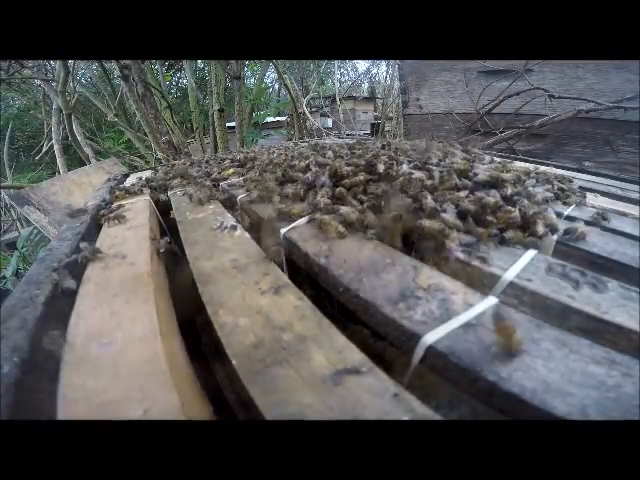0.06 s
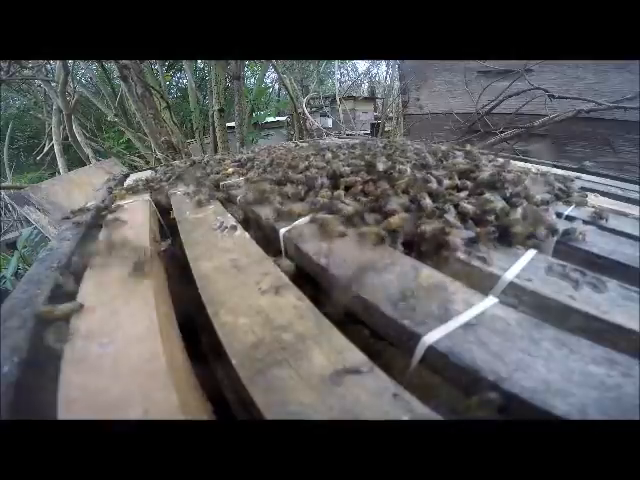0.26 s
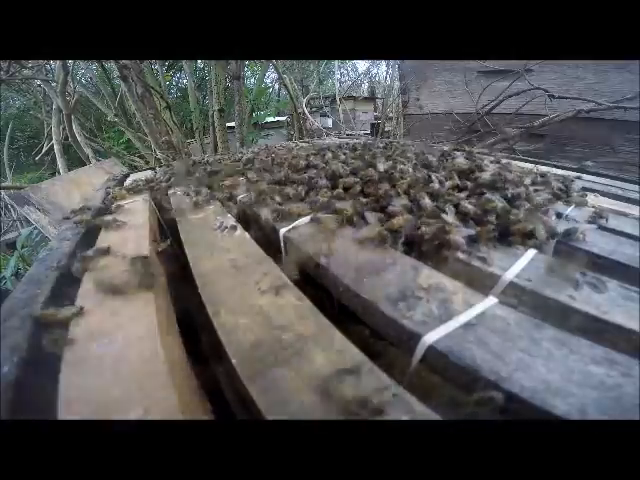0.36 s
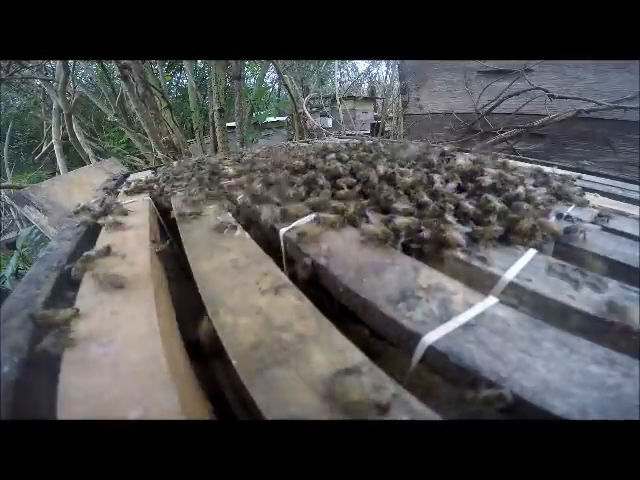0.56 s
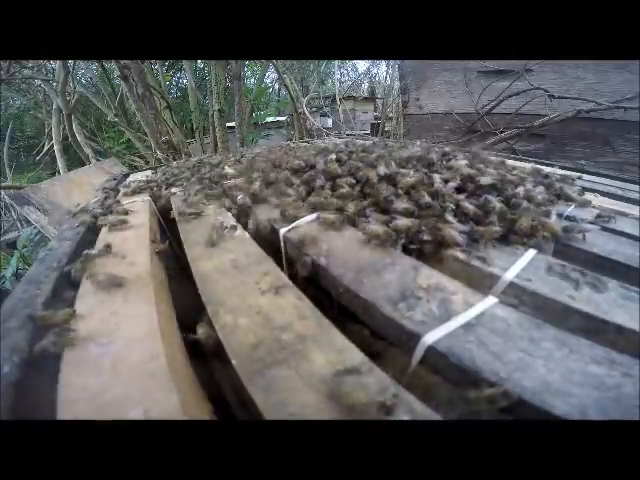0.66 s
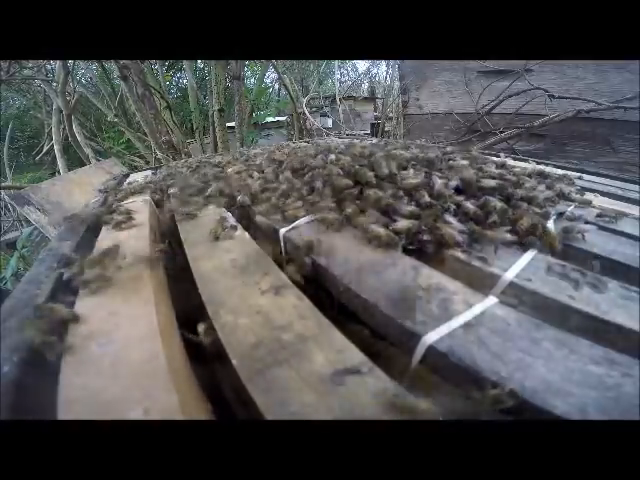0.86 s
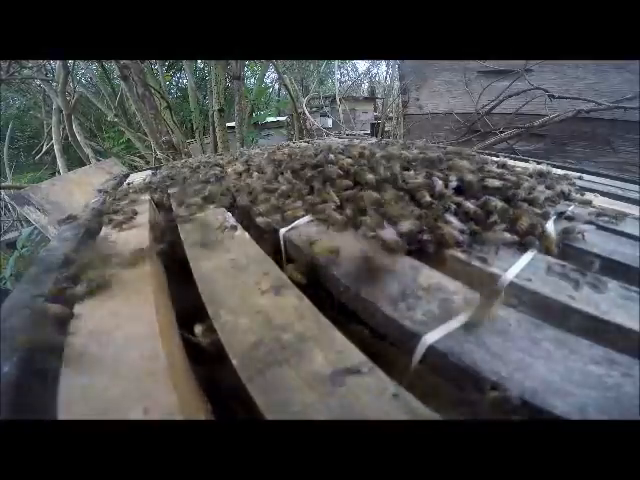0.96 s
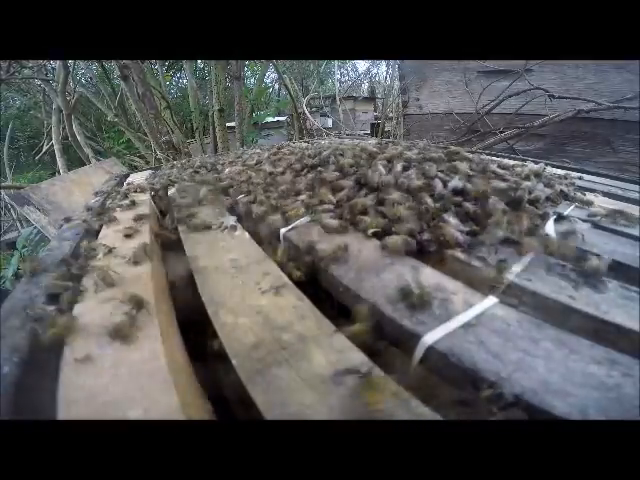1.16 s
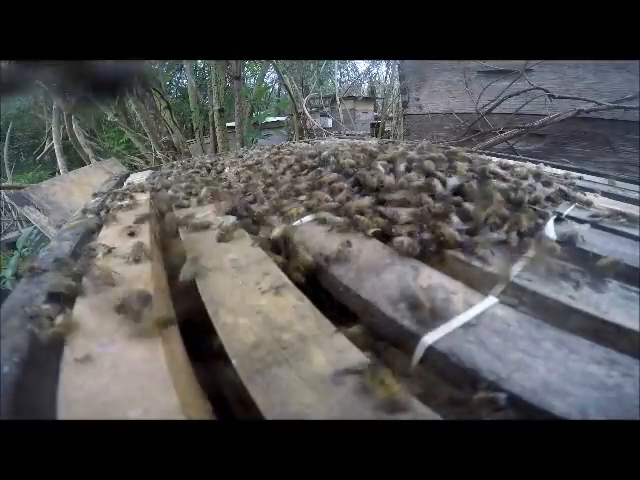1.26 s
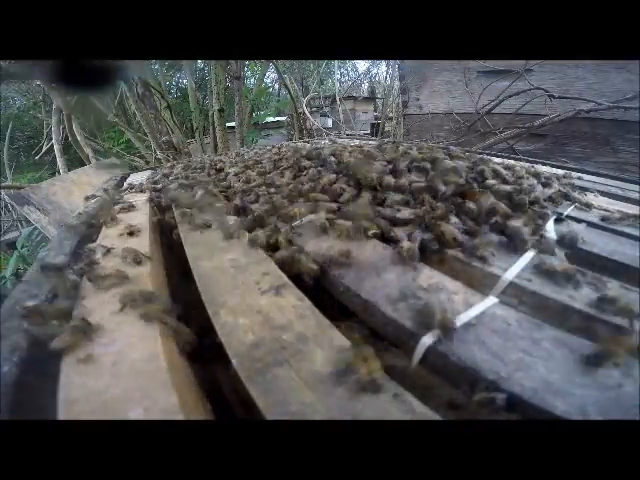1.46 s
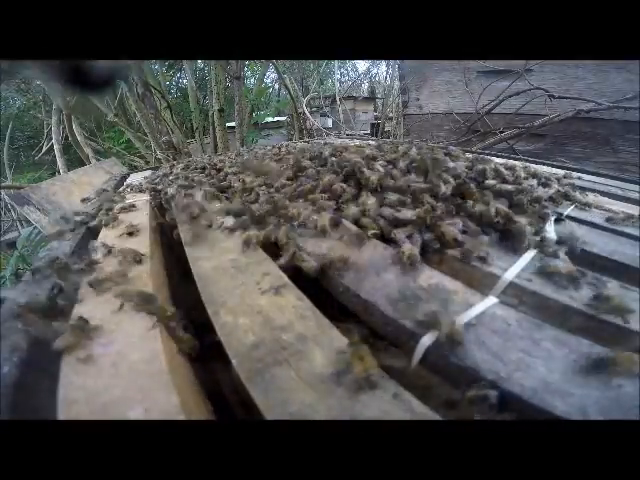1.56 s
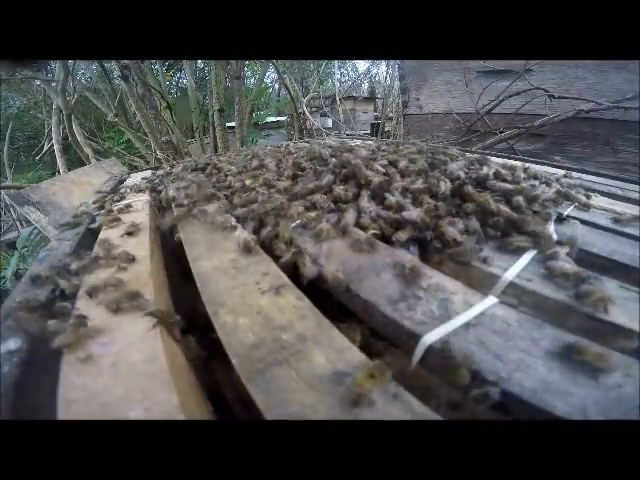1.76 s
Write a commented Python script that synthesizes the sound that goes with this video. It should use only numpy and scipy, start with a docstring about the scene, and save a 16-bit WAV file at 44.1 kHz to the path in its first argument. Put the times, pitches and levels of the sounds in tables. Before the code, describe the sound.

Clumps of bees knock and patter on hollow wood, first in a short burst, then after a brief lull in a longer, louder clatter with sharp clicks and dull box thumps, heard by a microphone resting on the bars outdoors.

```python
"""Outdoors at a hive, a mass of bees is shaken onto the wooden bars, on which the camera rests.
Clumps knock the bars, single bees patter on them and some strike the camera shell with a sharp tick:
each blow is a sum of decaying modes. The hive box booms under soft loads and shakes as noise-driven
resonances. Scraping legs and wings rustle as grainy noise; air rumble and hiss lie beneath."""
import sys
import numpy as np
from scipy import signal
from scipy.fft import rfft, irfft
from scipy.io import wavfile
from scipy.ndimage import uniform_filter1d

SR = 44100
rng = np.random.default_rng(int(sys.argv[2]) if len(sys.argv) > 2 else 0)


def invert_db(level):
    """Linear amplitude ratio for a level in decibels (20 dB per decade), elementwise."""
    return 10 ** (np.asarray(level, dtype=float) / 20)


def to_wav(s):
    """Save 16-bit WAV."""
    ch = np.atleast_2d(s).T  # columns
    pcm = np.round(np.clip(ch, -1, 1) * 32767)  # PCM
    wavfile.write(sys.argv[1], SR, pcm.astype(np.int16))


N = 81585  # length in samples

WOOD_SMEAR, SHELL_SMEAR = 0.007, 0.025  # blur of a ring as a share of its pitch, per kHz
SCATTER_DB, DETUNE = 4, 0.02  # chance spread of a mode's level [dB] and pitch [share]
SPOT_DB = 14  # level of the mode favoured by the struck spot, before hardness [dB]
STAGGER = 1.2  # spread of the modes' starts, in rise times
ROUGH, ROUGH_RISES = 0.2, 0.0015 / 0.0011  # raggedness [nepers]; wobble spacing, in rise times
HARD_TOP_HZ = 2220  # hardness stops lifting the bar modes further above here


def add(out, t, x):
    """Superposition: mix x into out from t seconds."""
    i = max(int(t * SR), 0)
    out[i:i + len(x)] += x[:N - i]


def coloured(points):
    """Spectral shaping: noise of rms 1 that follows (frequency [Hz], level [dB]) points."""
    hz, db = np.array(points).T
    bin_hz = np.fft.rfftfreq(N, 1 / SR)
    gain = invert_db(np.interp(np.log(bin_hz + 1), np.log(hz), db))
    x = irfft(rfft(rng.standard_normal(N)) * gain, N)
    return x / x.std()


def blow(modes, db, contact_s, chance, ring_s, tilt=0., spot_hz=0., scatter_db=SCATTER_DB,
         top_hz=SR / 2, smear=WOOD_SMEAR):
    """Modal superposition: staggered modes swell over contact_s and ring out raggedly; peak at db."""
    hz, gain_db, t60 = np.array(modes).T
    first_hz, k = hz[0], len(hz)
    level_luck, pitch_luck, phase_luck, start_luck = chance[:4 * k].reshape(4, k)
    rough_luck = chance[4 * k:]

    # Hardness tilts the levels per octave above the first mode
    gain_db = gain_db + tilt * np.log2(np.minimum(hz, top_hz) / first_hz) + scatter_db * level_luck
    nominal_hz = hz
    hz = hz * (1 + DETUNE * pitch_luck)
    width_hz = smear * hz ** 2 / 1000
    if spot_hz:
        # The mode nearest the favoured pitch takes that pitch and rings without blur
        near = np.argmin(np.abs(np.log(nominal_hz / spot_hz)))
        hz[near] = spot_hz
        gain_db[near] = SPOT_DB + tilt * np.log2(spot_hz / first_hz)
        width_hz[near] = 0

    t = np.arange(int(ring_s * SR)) / SR
    late = STAGGER * contact_s * np.abs(start_luck)
    late[np.argmax(gain_db)] = 0  # the strongest mode starts at once
    since = np.maximum(t - late[:, None], 0)

    # A random walk of the phase blurs each pitch
    phase = 2 * np.pi * (np.outer(hz, t) + phase_luck[:, None])
    drift = uniform_filter1d(rng.standard_normal(phase.shape), size=8).cumsum(axis=1)
    phase = phase + np.sqrt(2 * np.pi * width_hz / SR)[:, None] * drift

    rise = np.sin(np.pi / 2 * np.minimum(since / contact_s, 1)) ** 2
    decay = np.exp(-np.log(1000) * since / t60[:, None])
    wobble = np.interp(t / (ROUGH_RISES * contact_s), np.arange(len(rough_luck)), rough_luck)
    x = invert_db(gain_db) @ (np.sin(phase) * rise * decay) * np.exp(ROUGH * wobble)
    return x * invert_db(db) / np.abs(x).max()


# Band that travels along the bars: (lower edge [Hz], upper edge [Hz])
WOOD_BAND = [480, 5400]


def along_bars(x):
    """Band-limited transmission: the wood carries only the middle band."""
    return signal.sosfilt(signal.butter(5, WOOD_BAND, "band", fs=SR, output="sos"), x)


# Modes of the wooden bars: (frequency [Hz], relative level [dB], 60 dB decay time [s])
BAR_MODES = [(535, -7.5, 0.082), (624, -7, 0.057), (698.5, -5.5, 0.051), (766.6, -0.5, 0.038),
             (864, -3, 0.048), (914.6, 4.5, 0.033), (1231, 0.5, 0.038), (1698, -2, 0.013),
             (1953, -5.5, 0.027), (2442, -6.5, 0.029), (3041, -7.5, 0.024), (3604, -14.5, 0.012),
             (4550, -17, 0.023)]
# Clumps on the bars, with peaks as they are before travelling along the wood:
# (time [s], peak level [dB], pitch favoured by the struck spot [Hz], hardness [dB per octave])
CLUMPS = [(0.055, -17.5, 858, 0), (0.204, -8.5, 854, 3.5), (0.269, -9.5, 881, -4.5), (0.308, -15.5, 680, 5),
          (0.32, -14, 887, 2.5), (0.349, -11.5, 784, 6), (0.355, -10.5, 876, 13), (0.434, -8.5, 771, 5.5),
          (0.463, -14, 717, 7.5), (0.477, -15, 950, 1), (0.513, -13.5, 728, -9), (0.528, -10.5, 887.5, 8),
          (0.594, -1, 1937, 4.5), (0.637, -23, 558, 5.5), (0.668, -26.5, 880, 7), (0.685, -27, 1220, 7),
          (0.714, -31.5, 2480, 2), (0.722, -27, 1184, -7), (0.759, -16.5, 885, 2), (0.786, -19.5, 844, -2),
          (0.843, -10, 805.5, 1), (0.854, -14.5, 844, 7.5), (0.873, -4.5, 903, -1.5), (0.892, -21, 890, 2),
          (0.924, -5.5, 572, 6), (0.93, -6, 647, 1), (0.95, -10, 965, 3), (0.968, -12.5, 888, -6),
          (1.022, -11, 1174, -11.5), (1.045, -13.5, 642, 5), (1.079, -10, 682, -15), (1.086, -6.5, 860, 1),
          (1.126, -17, 912, 10.5), (1.151, -9.5, 751, 2.5), (1.163, -5.5, 817.4, 1), (1.17, -5, 867, 1),
          (1.202, -6, 1294, 15.5), (1.242, -12.5, 882, -1.5), (1.264, -3.5, 897, 9.5), (1.306, -11, 857, 5),
          (1.327, -18, 851, -1), (1.345, -14.5, 880, 10.5), (1.357, -9, 753, 6), (1.396, -17.5, 1220, 9),
          (1.418, -9, 883, 5.5), (1.432, -18.5, 943, -18), (1.538, -10.5, 992, -5), (1.553, -11, 876, -6),
          (1.563, -1, 694.4, -3.5), (1.618, -20.5, 887, 5.5), (1.679, -24.5, 966, 12),
          (1.739, -27.5, 935, 2.5)]


def knocks():
    """Impact excitation: clumps ring the bars, most strongly in the mode the struck spot favours."""
    out, chances = np.zeros(N), rng.standard_normal((len(CLUMPS), 150))
    rise_s = 0.0011
    for (t, db, spot_hz, hardness), chance in zip(CLUMPS, chances):
        add(out, t, blow(BAR_MODES, db, rise_s, chance, 0.1, hardness, spot_hz, top_hz=HARD_TOP_HZ))
    return along_bars(out)


# Modes of the camera shell: (frequency [Hz], relative level [dB], 60 dB decay time [s])
SHELL_MODES = [(317, -13, 0.0046), (1313, 2.5, 0.0064), (1950, -9.5, 0.022), (2506, 10, 0.0018),
               (3520, 7.5, 0.0027), (4414, -1.5, 0.014), (5260, 2, 0.0076), (6770, -11, 0.0096),
               (9430, -0.5, 0.0012), (12830, -14.5, 0.0047)]
# Bees striking the shell: (time [s], peak level [dB], hardness [dB per octave])
SHELL_STRIKES = [(0.5463, -4.5, -5), (0.8096, -26, 30.5), (0.9918, -1, -6), (1.1184, -22, 18),
                 (1.2028, -11.5, 23), (1.2143, -7.5, -7), (1.222, 7, -5.5), (1.263, -21, 16),
                 (1.2644, -11.5, -7), (1.17, -33, 13), (1.412, -27, 0), (1.3025, -34.5, 20),
                 (1.4878, 0, -8.5), (1.4911, 4, 4), (1.5632, -5, 1.5)]


def ticks():
    """Short-contact impact: hard, brief strikes set off the quickly damped modes of the shell."""
    out, chances = np.zeros(N), rng.standard_normal((len(SHELL_STRIKES), 300))
    rise_s = 0.0004
    for (t, db, hardness), chance in zip(SHELL_STRIKES, chances):
        x = blow(SHELL_MODES, db, rise_s, chance, 0.023, hardness, top_hz=9300, smear=SHELL_SMEAR)
        add(out, t, x)
    return out


# Stir, how much is falling and crawling: (time [s], level [dB])
STIR_CURVE = [(0, -46), (.17, -53), (.21, -37.5), (.4, -31.5), (.5, -23), (.6, -36), (.75, -41), (.86, -23),
              (1.2, -26), (1.56, -27.5), (1.7, -39), (1.85, -52.5)]


def patter():
    """Random impact train: single bees land at chance moments, with levels that follow the stir."""
    count = 900  # one bee in each equal slot of time
    above_stir_db, spread_db = 6.5, 32.5  # strongest blow over the stir; range below it
    rise_s, hardness, scatter_db = 0.0015, 0.077, 8  # hardness in dB per octave
    out, chances = np.zeros(N), rng.standard_normal((count, 250))
    luck = rng.random((count, 2))
    for k, (chance, (when, weakness)) in enumerate(zip(chances, luck)):
        t = (k + when) / count * N / SR
        db = np.interp(t, *np.array(STIR_CURVE).T) + above_stir_db - spread_db * weakness
        x = blow(BAR_MODES, db, rise_s, chance, 0.012, hardness, 0., scatter_db, HARD_TOP_HZ)
        add(out, t, x)
    return along_bars(out)


# Modes of the hive box: (frequency [Hz], relative level [dB], 60 dB decay time [s])
BOX_MODES = [(43, 2.5, 0.028), (77.3, -3, 0.16), (118.4, -5, 0.06), (149, -1, 0.035), (210.9, -7.5, 0.055),
             (299.3, -5.5, 0.022)]
# Soft loads on the box: (time [s], peak level [dB])
LOADS = [(0.177, -27.5), (0.202, -18), (0.317, -22.5), (0.849, -22.5), (0.918, -18), (1.149, -17),
         (1.349, -19)]


def thumps():
    """Slow-contact impact: gradual pushes set the low modes of the box booming."""
    out, chances = np.zeros(N), rng.standard_normal((len(LOADS), 150))
    rise_s = 0.0092
    for (t, db), chance in zip(LOADS, chances):
        add(out, t, blow(BOX_MODES, db, rise_s, chance, 0.25))
    return out


def shaking(t):
    """Random excitation of resonances: the moving load keeps the box modes wobbling."""
    calm_db, share = -56, 0.73  # gain at the least stir; dB of rise per dB of stir
    stir_db = np.interp(t, *np.array(STIR_CURVE).T)
    out = 0
    for hz, db, t60 in BOX_MODES:
        pole = np.exp(2j * np.pi * hz / SR - np.log(1000) / (t60 * SR))
        # Two equal resonators in cascade
        once = signal.lfilter([1], [1, -pole], rng.standard_normal(N))
        ring = signal.lfilter([1], [1, -pole], once).imag
        out = out + invert_db(db) * ring / ring.std()
    return out * invert_db(calm_db + share * (stir_db - stir_db.min()))


# Swells of legs and wings, levels before the grain: (centre time [s], length [s], level [dB])
SWELLS = [(0.494, 0.014, -26), (1.029, 0.011, -28.5), (1.543, 0.0067, -29.5)]
# Spectrum of the scraping: (frequency [Hz], relative level [dB per Hz])
SCRAPE_SPECTRUM = [(600, 5), (2500, 11.5), (4500, 0), (7000, -8.5), (15000, -28)]


def rustle(t):
    """Amplitude-modulated noise: scraping legs and wings swell up in grains."""
    steps = rng.standard_normal(N // 64 + 1)
    grain = invert_db(4.0 * np.repeat(steps, 64)[:N])  # a new chance level every 64 samples
    # A swell's length is 1.43 standard deviations of its bell curve
    swell = sum(invert_db(db) * np.exp(-0.5 * ((t - centre) / (length / 1.43)) ** 2)
                for centre, length, db in SWELLS)
    return coloured(SCRAPE_SPECTRUM) * grain * swell


# Spectrum of the air noise: (frequency [Hz], relative level [dB per Hz])
AIR_SPECTRUM = [(20, -6), (60, -1), (150, -27), (377, -13), (560, -18), (3500, -32.5), (5900, -31),
                (6700, -28), (7800, -40), (15200, -39.5), (15600, -64)]


def air(t):
    """Stationary noise in two bands: a steady rumble under a hiss that sinks near the end."""
    x = coloured(AIR_SPECTRUM) * invert_db(-43.5)
    rumble = uniform_filter1d(x, size=200)
    hiss = x - rumble
    sinks_s, sinks_db = 1.58, -6.5  # once the last strong clump has landed
    return rumble + hiss * invert_db(sinks_db * (t > sinks_s))


def scene():
    """Linear superposition: all layers sum on one microphone."""
    t = np.arange(N) / SR
    bees = knocks() + ticks()
    box = thumps() + shaking(t)
    return (bees + box + rustle(t) + air(t) + patter())[None]


def roll_off(x):
    """The treble ends steeply here."""
    return signal.sosfilt(signal.butter(12, 16510, fs=SR, output="sos"), x)


def record(dry):
    """Band limiting and clipping: the lowest and highest pitches are cut, the loudest peaks clip."""
    x = signal.sosfilt(signal.butter(2, 20, "high", fs=SR, output="sos"), dry)
    x = np.clip(x, -0.92, 0.92)
    x = signal.sosfilt(signal.ellip(6, 0.3, 50, 16300, fs=SR, output="sos"), x)
    return roll_off(x)


dry = scene()
out = record(dry)
to_wav(out)
```